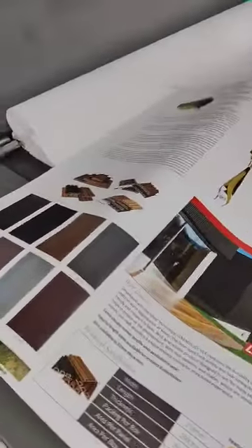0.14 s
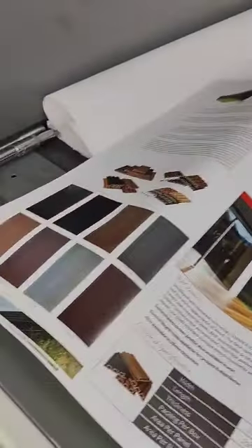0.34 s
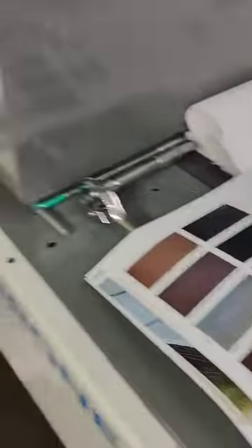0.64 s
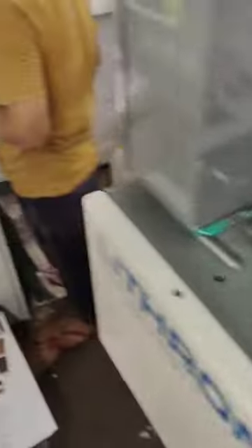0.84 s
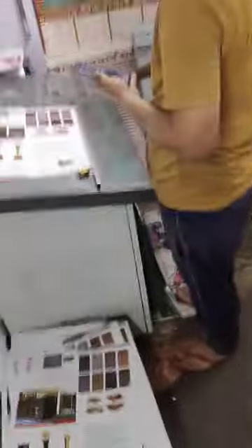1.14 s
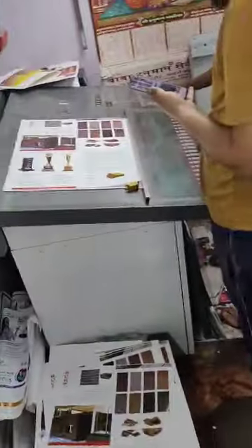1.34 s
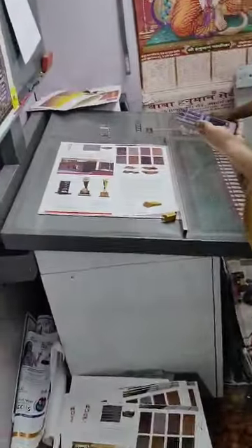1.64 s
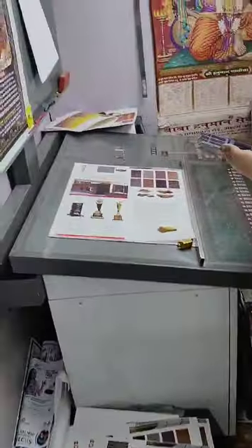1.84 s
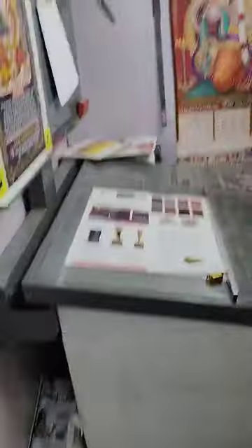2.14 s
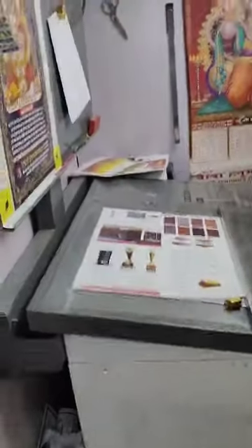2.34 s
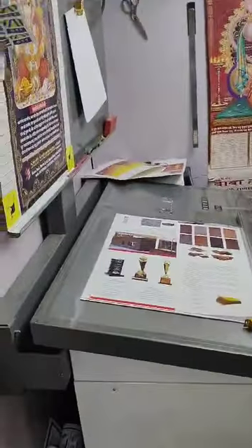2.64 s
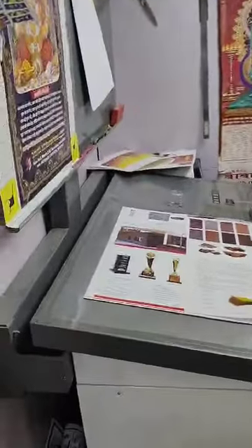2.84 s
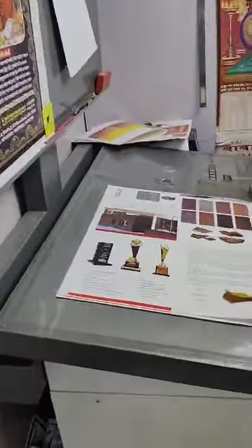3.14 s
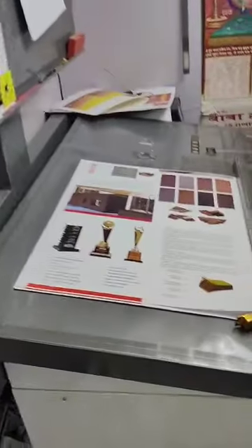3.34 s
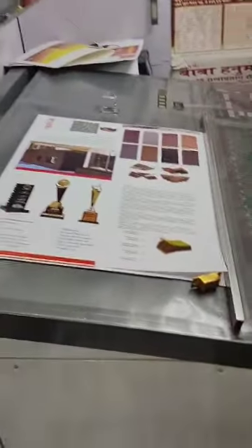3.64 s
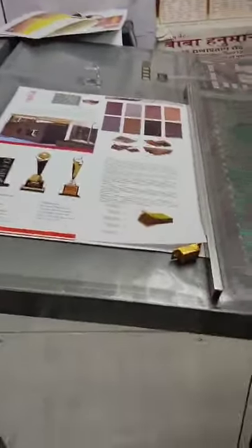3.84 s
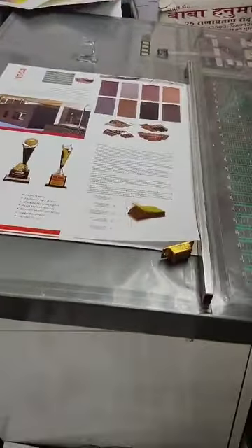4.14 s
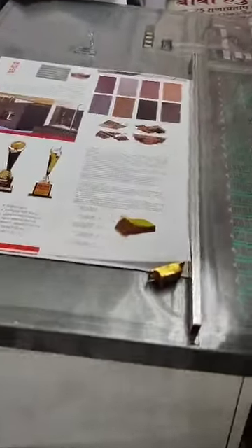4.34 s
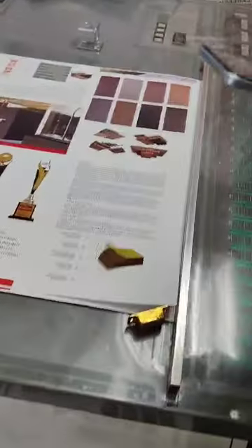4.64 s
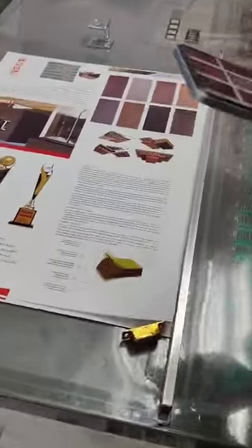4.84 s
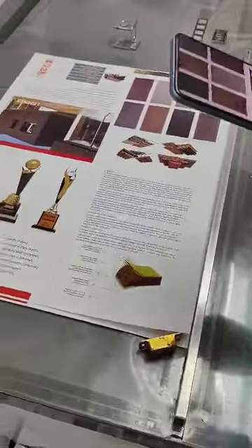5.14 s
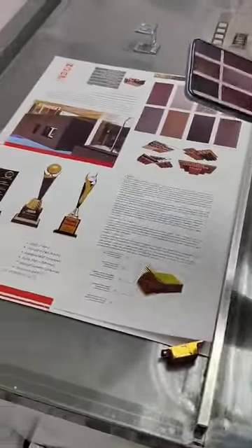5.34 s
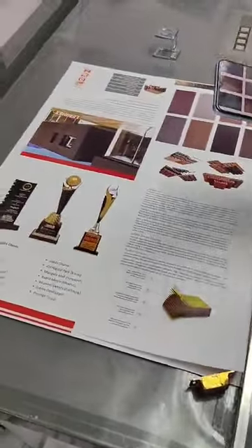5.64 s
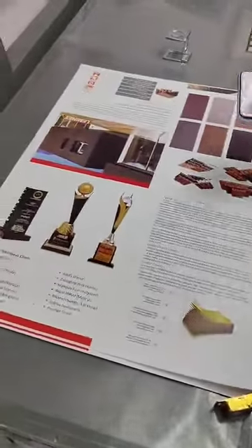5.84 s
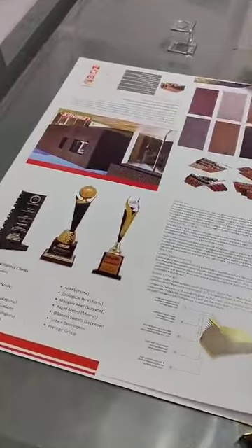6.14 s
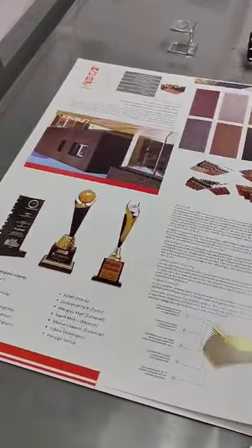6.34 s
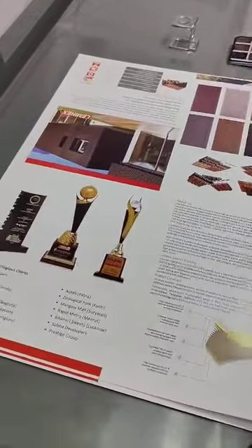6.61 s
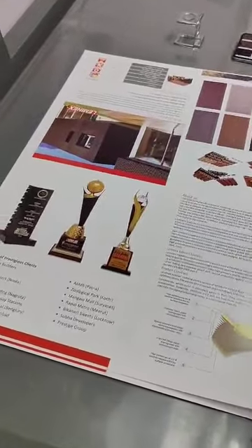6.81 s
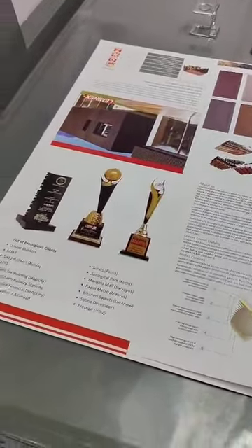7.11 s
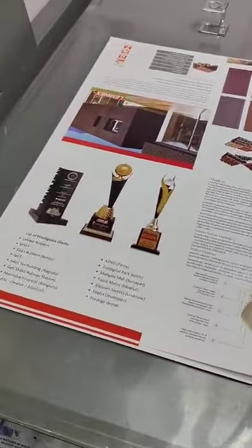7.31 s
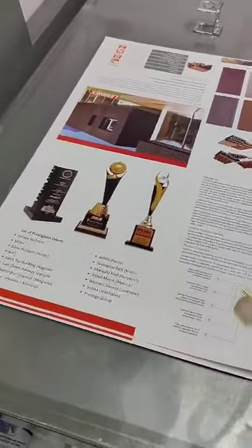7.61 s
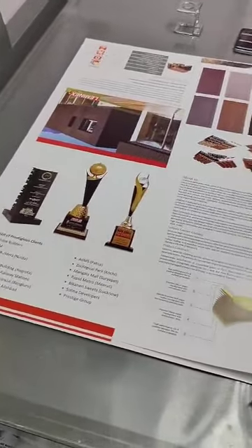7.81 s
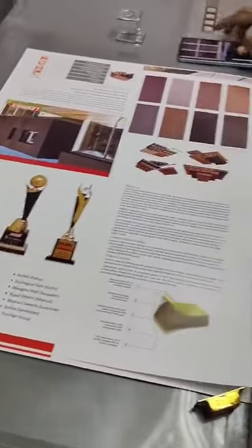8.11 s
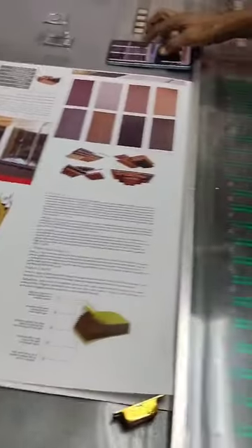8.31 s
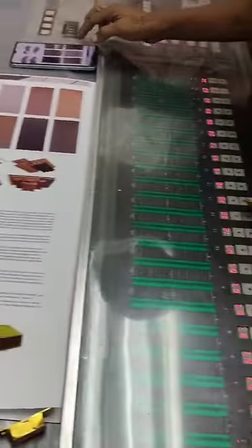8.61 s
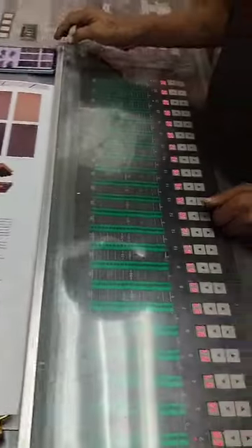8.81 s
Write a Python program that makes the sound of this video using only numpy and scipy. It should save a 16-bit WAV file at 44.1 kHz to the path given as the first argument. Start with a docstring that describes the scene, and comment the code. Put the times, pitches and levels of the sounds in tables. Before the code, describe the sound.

A printing press rumbles and rattles loudly in a small hard room, blasting hissing air about twice a second over a wavering pump whine.

```python
"""Gears and chains of an offset press rumble and rattle in a small, hard-walled shop, motors hum, air hisses.
From 0.37 s a valve fires a blast of air about twice a second, with gripper snaps and paper sounds around it.
From 0.8 s the listener walks off from the delivery; hum and whine swell and fade in the standing waves.
Loose metal clacks, thickest near 1 s and 5 s. Noise is shaped by envelopes and spectra, tones are sines,
metal is resonant modes; a gain control ducks everything a little under each blast."""
import sys
import numpy as np
from scipy import signal
from scipy.fft import rfft, irfft, next_fast_len
from scipy.io import wavfile
from scipy.ndimage import uniform_filter1d, minimum_filter1d, map_coordinates

SR = 44100
rng = np.random.default_rng(int(sys.argv[2]) if len(sys.argv) > 2 else 0)


def unload_audio(sound):
    """Save the sound as a 16-bit wav file, at the path given as the first command line argument."""
    columns = np.transpose(np.atleast_2d(sound))
    # keep every value between -1 and 1, then stretch to whole-number steps
    steps = np.round(np.clip(columns, -1, 1) * 32767)
    wavfile.write(sys.argv[1], SR, steps.astype(np.int16))


N = 395577

# the press runs at an even pace: time per sheet, first blast
CYCLE_S, FIRST_SHEET_S = .5148, .374
# one row per sheet: (air blast level/dB, ring of the valve's throat level/dB, gripper snap level/dB)
SHEET_LEVELS = [(-17, -27, -26), (-16, -20, -34), (-15.5, -23, -25), (-14.5, -19, -21.5),
                (-14.5, -18.5, -28), (-14, -22, -24), (-12.5, -19, -35), (-12, -19, -24), (-14.5, -22, -29),
                (-15, -17, -23.5), (-15, -22, -30), (-12, -18, -25), (-11.5, -17, -28.5), (-14, -20, -32),
                (-12, -16, -25.5), (-13, -18, -31), (-15, -23, -29)]


def amp(db):
    """Decibels to linear gain."""
    return 10 ** (np.asarray(db) / 20)


def unit(x):
    """Scales a signal to rms 1."""
    return x / np.sqrt(np.mean(x ** 2) + 1e-20)


def clock():
    """The time of each sample in seconds."""
    return np.arange(N) / SR


def along(points, hz):
    """Reads (f/Hz, value) points on a log frequency axis."""
    f, v = np.transpose(points)
    return np.interp(np.log(hz + 1), np.log(f + 1), v)


def level(points):
    """The gain at each sample from (t/s, level/dB) points."""
    return amp(np.interp(clock(), *np.transpose(points)))


def wobble(rate):
    """A smooth random curve with rate knots a second."""
    coarse = np.arange(0, N + 64, 64) / SR
    knots = rng.standard_normal(int(N * rate / SR) + 4)
    return np.interp(clock(), coarse, map_coordinates(knots, [coarse * rate]))


def filtered(x, response):
    """Multiplies the spectrum of x by a response of frequency."""
    m = next_fast_len(N + SR // 2)
    return irfft(rfft(x, m) * response(np.fft.rfftfreq(m, 1 / SR)), m)[..., :N]


def diffuse(pair, spectrum):
    """Two signals become a room's field of rms 1: alike in the bass, unrelated in the treble."""
    # (f/Hz, left-right correlation)
    likeness = [(60, .9), (130, .93), (290, .77), (630, .38), (1300, -.07), (3000, 0)]

    def response(hz):
        angle = np.arccos(np.clip(along(likeness, hz), -1, 1)) / 2
        return amp(along(spectrum, hz)) * np.array([np.cos(angle), np.sin(angle)])

    mid, side = filtered(pair, response)
    return unit(np.array([mid + side, mid - side]))


def noise(spectrum):
    """Stereo noise of rms 1 from (f/Hz, relative level/dB) points."""
    return diffuse(rng.standard_normal((2, N)), spectrum)


def turning(share):
    """Stereo noise of which a share of the power comes back with every second sheet, as the same teeth meet."""
    same = rng.standard_normal((2, N))[:, np.arange(N) % round(2 * CYCLE_S * SR)]
    share = np.clip(share, 0, 1)
    return np.sqrt(share) * same + np.sqrt(1 - share) * rng.standard_normal((2, N))


def rattle(rate, spread_db, life):
    """Envelope of rms 1 from random contacts, rate a second, each dying away over life seconds."""
    chance = rng.random(N)
    size = np.minimum(rng.standard_normal(N), 2.8)
    contacts = (chance < rate / SR) * amp(spread_db * size) ** 2
    power = signal.lfilter([1], [1, -np.exp(-2 / (life * SR))], contacts)
    return unit(np.sqrt(power))


def add(track, start, rise, hold, fall, gain):
    """Adds an envelope, cut at one second, that opens, holds until its age is hold, then dies away."""
    part = track[round(start * SR):][:SR]
    age = np.arange(len(part)) / SR
    part += gain * np.minimum(age / rise, 1) * np.exp(-np.maximum(age - hold, 0) / fall)


def every_sheet(delay, rise, hold, fall, levels_db=0):
    """One stroke in each cycle of the press, at a fixed delay from the blast."""
    track = np.zeros(N)
    starts = FIRST_SHEET_S + CYCLE_S * np.arange(len(SHEET_LEVELS)) + delay
    for s, gain in np.broadcast(starts, amp(levels_db)):
        add(track, s, rise, hold, fall, gain)
    return track


def ringing(push, modes):
    """Noise shaped by an envelope rings in (f/Hz, width/Hz, level/dB) modes; a steady push of 1 gives rms 1."""
    def body(f):
        # neighbouring modes alternate in sign
        return sum((-1) ** k * amp(db) * 1j * f * width / (centre * centre - f * f + 1j * f * width)
                   for k, (centre, width, db) in enumerate(modes))

    size = np.sqrt(np.mean(np.abs(body(np.arange(0, SR / 2, 10))) ** 2))
    return filtered(push * rng.standard_normal((2, N)), body) / size


def sines(lines):
    """Clean tones from (f/Hz, level/dB) rows."""
    turn = 2 * np.pi * clock()
    return np.sqrt(2) * sum(amp(db) * np.sin(hz * turn + rng.uniform(0, 2 * np.pi)) for hz, db in lines)


def tone(hz, scatter, flutter_rate, lead=0):
    """A tone of rms about 1: a steady part, lead radians early on the left, and a part fluttering at each port."""
    scatter = np.clip(scatter, 0, 1)
    echo = np.array([wobble(flutter_rate) + 1j * wobble(flutter_rate) for port in range(2)])
    phase = 2 * np.pi * np.cumsum(hz * np.ones(N)) / SR + rng.uniform(0, 2 * np.pi)
    phase = phase + lead * np.array([[.5], [-.5]])
    swing = np.sqrt(2 * (1 - scatter)) + np.sqrt(scatter) * echo
    return swing.real * np.cos(phase) - swing.imag * np.sin(phase)


def blasts():
    """A valve opens for every sheet: a thin spit, then a sputtering jet of air that rings in the valve's throat."""
    # colour of the full jet: (f/Hz, relative level/dB)
    jet_colour = [(500, -17), (1000, -4), (1700, 3.3), (2200, 2), (2550, 4.3), (2900, 1.3), (3900, 1),
                  (5000, -4), (9000, -2.5), (11000, -3.5), (12500, -3), (13700, 0), (14400, -3)]
    # colour of the valve's first narrow opening: (f/Hz, relative level/dB)
    spit_colour = [(6000, -26), (11000, -10), (12500, -5), (13650, 6), (14400, -19)]
    # resonances of the valve's throat: (f/Hz, width/Hz, relative level/dB)
    throat_modes = [(1255, 166, 7), (1506, 210, -3.5)]
    jet_db, throat_db, _ = np.transpose(SHEET_LEVELS)
    flow = every_sheet(delay=0, rise=.013, hold=.035, fall=.061, levels_db=jet_db)
    honk = every_sheet(delay=-.0033, rise=.0099, hold=.032, fall=.048, levels_db=throat_db)
    opening = amp(-19.5) * every_sheet(delay=-.014, rise=.02, hold=.033, fall=.031)
    sputter = rattle(rate=900, spread_db=2.3, life=.005)
    jet = sputter * (flow * noise(jet_colour) + opening * noise(spit_colour))
    return jet + ringing(sputter * honk, throat_modes)


def grippers():
    """A row of steel grippers strikes shut on every sheet and chatters, some cycles harder than others."""
    # ringing steel: (f/Hz, width/Hz, relative level/dB)
    steel_modes = [(3040, 160, -10), (3710, 140, -3.5), (3935, 73, 0.5), (4120, 150, -6), (8100, 450, -9.5)]
    strike_db = -1.5  # against the chatter
    snap_db = np.transpose(SHEET_LEVELS)[2]
    snap = every_sheet(delay=0, rise=.0013, hold=.062, fall=.032, levels_db=snap_db)
    strike = every_sheet(delay=.004, rise=.0004, hold=.002, fall=.005, levels_db=snap_db + strike_db)
    chatter = rattle(rate=350, spread_db=2.3, life=.004)
    return ringing(snap * chatter + strike, steel_modes)


def drive():
    """Shafts throb in the floor, the heavy frame rumbles, gear teeth and gripper chains rattle through the covers."""
    # slow shaft tones in the floor: (f/Hz, relative level/dB)
    throb_tones = [(27.4, -5), (48.3, -4.5), (55, -16)]
    # floor throb over time: (t/s, level/dB)
    throb_level = [(0, -29), (2.6, -26), (3.3, -21), (4.0, -34), (5.0, -21), (6.8, -27.5), (7.9, -22),
                   (8.97, -31)]
    # colour of the frame rumble: (f/Hz, relative level/dB)
    frame_colour = [(15, -25), (38, -14.5), (70, -10), (98, -2.5), (130, -2.5), (175, -7), (230, -8.5),
                    (330, -18.5), (600, -43)]
    # colour of the gear roar: (f/Hz, relative level/dB)
    gear_colour = [(60, -17), (160, -12.5), (235, -2.5), (295, -3), (375, -0.5), (505, -2.5), (580, -4),
                   (680, -3.5), (760, -7), (1030, -9), (1190, -7.5), (1350, -14.5), (1600, -23.5),
                   (3000, -31.5)]
    frame_db, gears_db = -17.5, -14.5
    # extra gear level beside the delivery, when the walk starts, how long it takes
    delivery_db, leave_s, walk_s = 1.0, .8, .68

    sway_db = .8 * np.array([wobble(9), wobble(9)])
    throb = level(throb_level) * amp(sway_db) * sines(throb_tones)
    frame = amp(frame_db + .85 * wobble(3)) * diffuse(turning(share=.12), frame_colour)
    beside_delivery = np.clip(1 - (clock() - leave_s) / walk_s, 0, 1)
    teeth = rattle(rate=1200, spread_db=0, life=.014)
    gears = amp(gears_db + delivery_db * beside_delivery) * diffuse(teeth * turning(share=.16), gear_colour)
    return throb + frame + gears


def sheets():
    """Each cycle a cam scrapes and the sheet lifts, then slides on after the blast; paper edges tick in between."""
    # edge ticks in every cycle: (delay from the blast/s, level/dB, dying time/s)
    edge_ticks = [(-.128, -24, .006), (-.023, -20.5, .007), (.092, -23, .009), (.141, -18.5, .008),
                  (.262, -24.5, .025)]
    cam_db, lift_db, slide_db = -26, -29.5, -25.5
    scrape = noise([(700, -32), (1350, 14), (2000, 10), (4000, -26)])
    cam = amp(cam_db) * every_sheet(delay=-.086, rise=.027, hold=.031, fall=.02) * scrape
    lift = amp(lift_db) * every_sheet(delay=-.026, rise=.006, hold=.018, fall=.015)
    slide = amp(slide_db) * every_sheet(delay=.042, rise=.025, hold=.085, fall=.047)
    rustle = rattle(rate=600, spread_db=2.8, life=.004)
    paper = (lift + slide) * rustle * noise([(1000, -15), (3500, -9), (8500, 3), (14000, -2)])
    edges = sum(amp(db) * every_sheet(delay, rise=.0015, hold=.003, fall=dies)
                for delay, db, dies in edge_ticks)
    return cam + paper + edges * noise([(2000, -14), (8000, -12), (13000, 4)])


def clacks():
    """Now and then a loose metal part chatters: a dry crack, or a ring when it swings free."""
    # the loudest clacks: (t/s, level/dB, length/s, share of the power that rings/0-1)
    clack_list = [(.377, -20, .012, .1), (.563, -22, .006, .4), (.893, -13, .03, .42),
                  (.932, -15, .02, .48), (.96, -16.5, .016, .42), (1.005, -25, .03, .5),
                  (1.075, -23, .07, .06), (1.272, -19, .014, .25), (1.942, -20, .025, 0),
                  (2.632, -22, .005, .4), (3.318, -20.5, .028, .3), (4.815, -23.5, .014, .6),
                  (4.876, -20, .014, .55), (5.038, -20.5, .024, .15), (5.43, -24, .02, .6),
                  (5.737, -22, .005, .4), (8.485, -23.5, .04, .5)]
    # the loose metal: (f/Hz, width/Hz, relative level/dB)
    metal_modes = [(1780, 160, -11), (2030, 90, -6), (2155, 90, 0), (2400, 190, -4), (2970, 100, -1.5),
                   (3330, 160, -7), (3650, 130, -8), (4130, 150, -5)]
    # colour of the dry crack: (f/Hz, relative level/dB)
    crack_colour = [(1200, -24), (1900, 1), (2600, -4), (3900, -0.5), (5200, 10.5), (9000, 2)]
    ring, crack = np.zeros(N), np.zeros(N)
    for s, db, length, share in clack_list:
        for track, part in ((ring, share), (crack, 1 - share)):
            add(track, s, rise=.0007, hold=length, fall=.026, gain=amp(db) * np.sqrt(part))
    chatter = rattle(rate=850, spread_db=2.4, life=.005)
    return ringing(ring * chatter, metal_modes) + crack * chatter * noise(crack_colour)


def whine():
    """The pump's whine swells at one port, then the other, as they pass through the room's standing waves."""
    # the whine along the walk: (t/s, left level/dB, right level/dB, lead of the left port/rad)
    whine_walk = [(0, -33, -35, 2), (.3, -22.5, -26, 2.3), (.48, -31, -32, 2.5), (.68, -20.5, -25, .3),
                  (.9, -29, -26, .3), (1.05, -23, -27, 2.4), (1.65, -20.5, -28, 1.6), (1.85, -30, -32, 1.8),
                  (2.1, -24, -22, 1.3), (2.33, -23, -20.5, 2.7), (2.52, -31, -26, 2.4),
                  (2.75, -25.5, -18.5, 1), (2.92, -21.5, -19.5, 1.1), (3.2, -26, -31, 2.4),
                  (3.38, -22, -26, 1), (3.85, -30, -31, 1), (4.1, -26, -25, .5), (4.42, -28, -21.5, 1),
                  (4.8, -25.5, -25, -1.2), (5.15, -28, -29, -1.8), (5.42, -22, -26, -2),
                  (5.85, -27, -28, -1.8), (6.25, -25, -24, .5), (6.6, -32, -24, 1.5),
                  (7.3, -28, -18.5, 1.5), (7.62, -32, -23, 1.5), (7.8, -30, -18.5, .8), (8.2, -24, -23, .8),
                  (8.45, -28, -28, 2.5), (8.85, -32, -20, 2), (8.97, -32, -24, 2)]
    # rough tones just under the whine: (f/Hz, level/dB)
    side_tones = [(1126, -34.5), (1145, -36.5)]
    times, *columns = np.transpose(whine_walk)
    left_db, right_db, lead = (np.interp(clock(), times, column) for column in columns)
    gain = amp(np.array([left_db, right_db]) + 1.4 * wobble(8))
    pure = gain * tone(1164.5, scatter=.18, flutter_rate=18, lead=lead)
    rough = sum(amp(db + 3 * wobble(3)) * tone(hz, scatter=.9, flutter_rate=18) for hz, db in side_tones)
    return pure + rough


def motors():
    """Motor hum, gear drone, roller tone and a thin whistle swell and fade with the listener's place."""
    # motor hum along the walk through its standing waves: (t/s, level/dB)
    hum_level = [(0, -23.5), (1.0, -22.5), (1.65, -26), (2.05, -35), (2.7, -27.5), (4.15, -26),
                 (4.65, -17.5), (6.3, -19), (8.38, -16.5), (8.65, -34)]
    # gear drone: (t/s, level/dB)
    drone_level = [(.5, -25), (1.1, -39), (2.7, -35), (3.15, -29), (3.3, -21), (3.85, -21.5), (4.0, -29),
                   (4.15, -21), (4.4, -21), (4.6, -34), (8.97, -34)]
    # pitch of the gear drone: (t/s, f/Hz)
    drone_pitch = [(0, 390), (3.3, 394), (3.8, 392.5), (4.15, 391), (4.3, 400), (4.5, 399), (4.8, 392)]
    # roller tone: (t/s, level/dB)
    roller_level = [(0, -31), (.25, -31), (.6, -37), (1.3, -40), (1.6, -30), (1.85, -31.5), (2.2, -40),
                    (5.45, -36), (5.62, -27), (5.82, -24), (6.0, -38), (8.97, -36)]
    # the motor's thin whistle: (t/s, level/dB)
    whistle_level = [(0, -47), (.6, -41.5), (.9, -46), (3.1, -47), (3.25, -37), (3.38, -37.5), (3.55, -47),
                     (6.05, -45), (6.22, -39.5), (6.6, -40), (6.85, -45), (8.97, -45)]

    hum = level(hum_level) * tone(193.8, scatter=.026, flutter_rate=7.1)
    pitch = np.interp(clock(), *np.transpose(drone_pitch)) + 2.5 * wobble(7)
    # a swell of about 6.5 Hz, as when two close gear tones beat
    beat = 1 + .55 * np.sin(2 * np.pi * 6.5 * clock() + wobble(3))
    drone = level(drone_level) * beat * tone(pitch, scatter=.22, flutter_rate=16)
    roller = level(roller_level) * tone(680 + 3 * wobble(7), scatter=.4, flutter_rate=14)
    whistle = level(whistle_level) * tone(4434, scatter=.6, flutter_rate=20)
    return hum + drone + roller + whistle + shaft_tones(width_hz=3.1)


def shaft_tones(width_hz):
    """Weak steady tones, partly smeared into narrow bands by uneven running and the room."""
    # shaft and gear tones: (f/Hz, level/dB)
    steady_tones = [(97, -31.5), (454.5, -33.5), (603, -44), (950.3, -40.5), (953.4, -39.5), (985, -42.5),
                    (1076, -42), (1983, -50.5), (2217, -47), (3493, -53), (5825, -52)]

    def bands(f):
        return sum(amp(db) * np.exp(-((f - hz) / width_hz) ** 2) for hz, db in steady_tones)

    clean = sines(steady_tones)
    smeared = unit(filtered(rng.standard_normal((2, N)), bands))
    return clean + amp(-3.5) * clean.std() * smeared


def covers():
    """The shaking frame sets the sheet-metal covers booming in uneven surges."""
    # the sheet metal: (f/Hz, width/Hz, relative level/dB)
    cover_modes = [(347, 28, -0.5), (377, 25, 1.5), (425, 24, -3), (463, 20, -1.5)]
    # the boom over time: (t/s, level/dB)
    cover_level = [(0, -18), (.75, -24), (1.0, -27), (2.4, -26.5), (4.6, -23.5), (5.3, -30), (7.6, -21.5),
                   (8.6, -23.5), (8.97, -28)]
    surge = amp(2.5 * wobble(7))
    boom = diffuse(ringing(surge, cover_modes), [(150, -20), (300, 0), (500, 0), (1000, -20)])
    return level(cover_level) * boom


def air():
    """Blowers hiss, easing just before each blast, mixed with the fine ticking of chains and paper."""
    # colour of hiss and ticking: (f/Hz, relative level/dB)
    hiss_colour = [(300, -20), (1000, -3), (1700, -.4), (3400, -2.1), (7000, -5), (14000, -7.3)]
    hiss_db, ticking_db, lull_depth = -21, -27.5, .19
    lull = 1 - lull_depth * every_sheet(delay=-.11, rise=.05, hold=.1, fall=.02)
    ticking = rattle(rate=220, spread_db=2.8, life=.007) * noise(hiss_colour)
    return lull * (amp(hiss_db) * noise(hiss_colour) + amp(ticking_db) * ticking)


def scene():
    """The press, its sheets and the shop's machines together."""
    press = blasts() + grippers() + drive() + sheets() + clacks()
    return press + whine() + motors() + covers() + air()


def gain_control(x, knee_db, window):
    """Turns everything down while the treble, averaged over window seconds, is loud."""
    treble = filtered(x, lambda hz: hz > 2000)
    power = np.abs(uniform_filter1d(np.mean(treble ** 2, axis=0), int(window * SR)))
    return x / np.sqrt(1 + power / amp(knee_db) ** 2)


def limiter(x, ceiling_db):
    """Rides the highest peaks down within a few milliseconds."""
    needed = np.minimum(1, amp(ceiling_db) / (np.abs(x).max(axis=0) + 1e-9))
    return x * uniform_filter1d(minimum_filter1d(needed, size=400), size=400)


def record(dry):
    """Gain control, the colour of each microphone port, a limiter and the band limit."""
    # colour of the ports: (f/Hz, left level/dB, right level/dB)
    port_colour = np.array([(1700, .3, 0), (2200, 3.7, 1.3), (3400, .6, 3.4), (4400, 0, 4.8),
                            (5250, -5.5, -5.3), (5580, -15, -15), (5850, -8, -7), (6300, -17, -16.5),
                            (6900, -10.5, -8.5), (7300, -1.5, -1.5), (8200, 8, 0), (9300, 3, -5),
                            (10600, .5, -.5), (11300, .3, 5.5), (11900, -6.8, -6.5), (14200, -8.6, -10)])
    left, right = port_colour[:, [0, 1]], port_colour[:, [0, 2]]
    held = amp(.7) * gain_control(dry, knee_db=-10.3, window=.014)
    coloured = filtered(held, lambda hz: amp([along(left, hz), along(right, hz)]))
    return filtered(limiter(coloured, ceiling_db=-.6), lambda hz: hz < 14350)


dry = scene()
out = record(dry)
unload_audio(out)
```